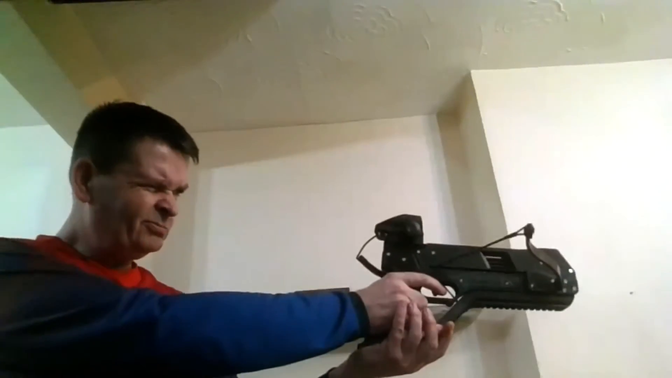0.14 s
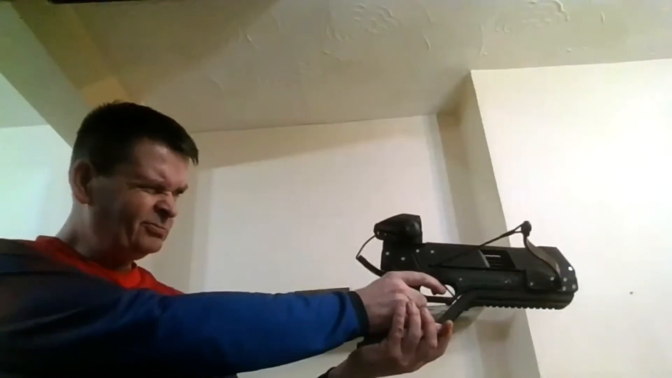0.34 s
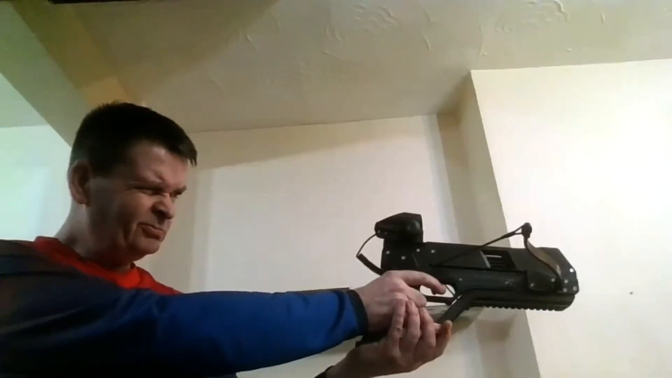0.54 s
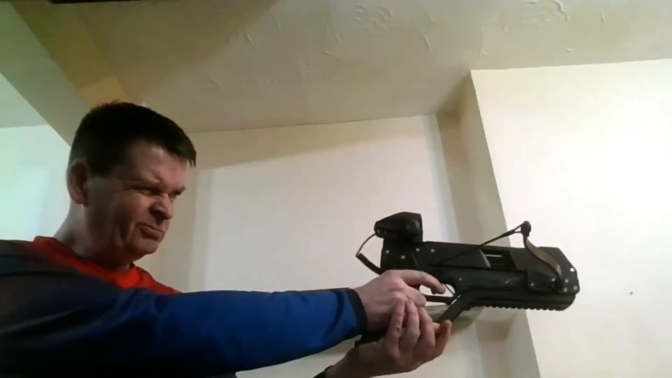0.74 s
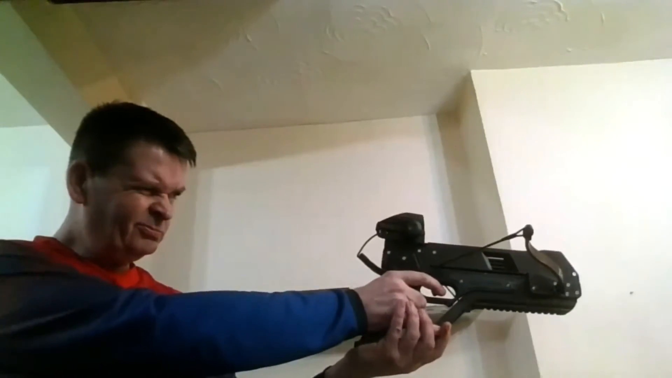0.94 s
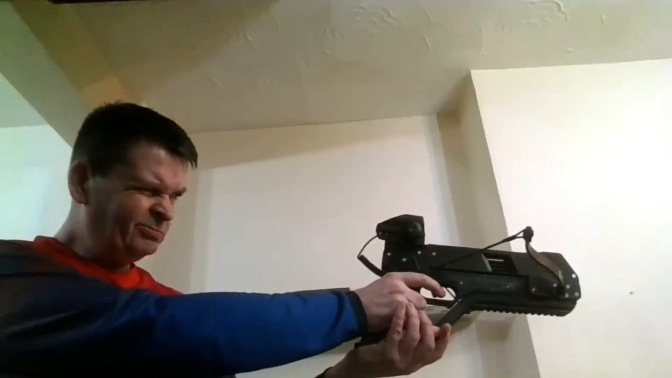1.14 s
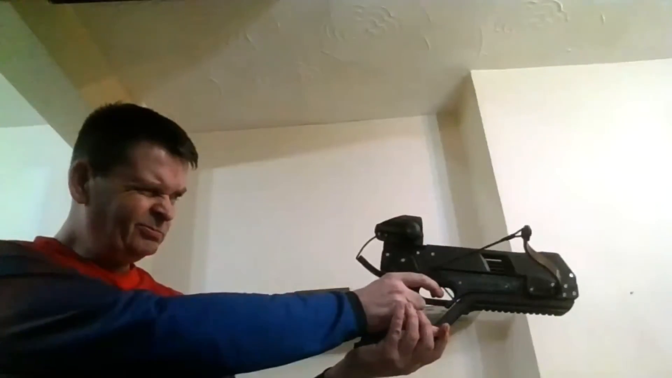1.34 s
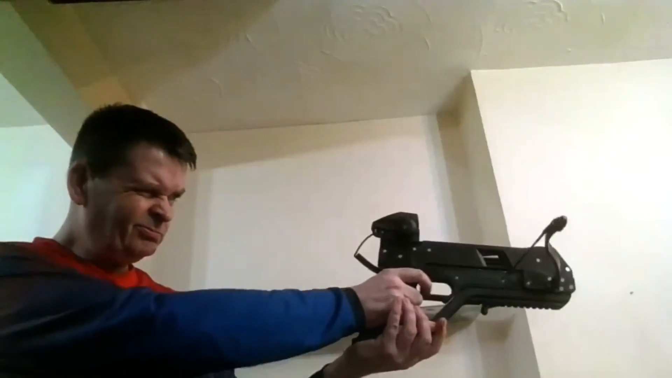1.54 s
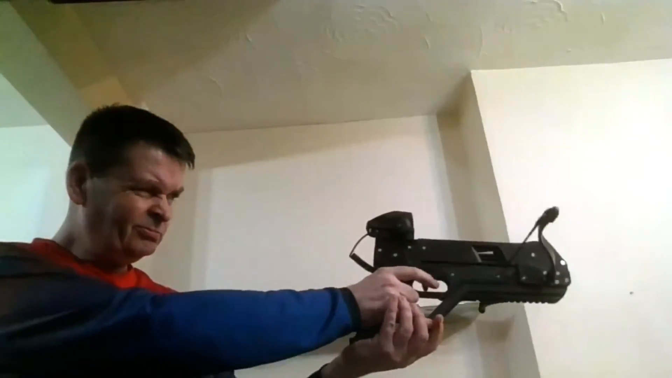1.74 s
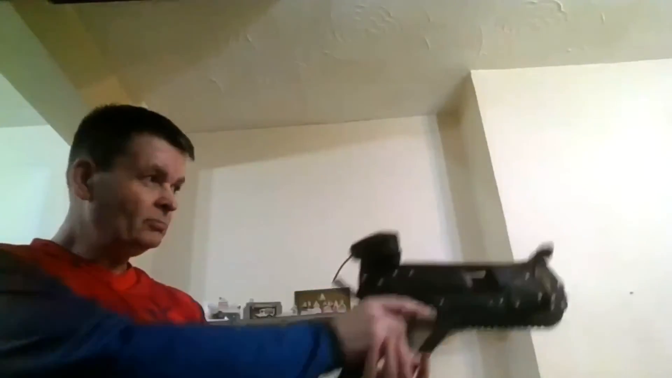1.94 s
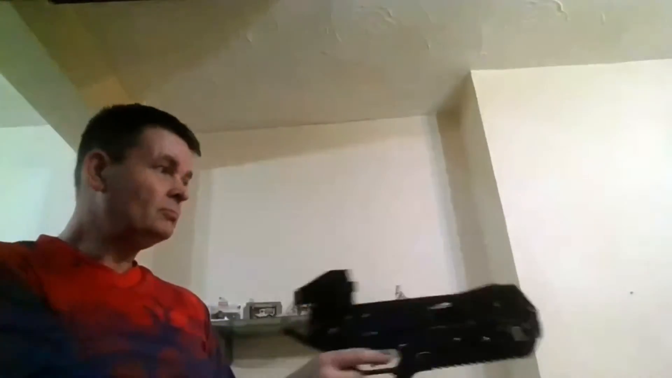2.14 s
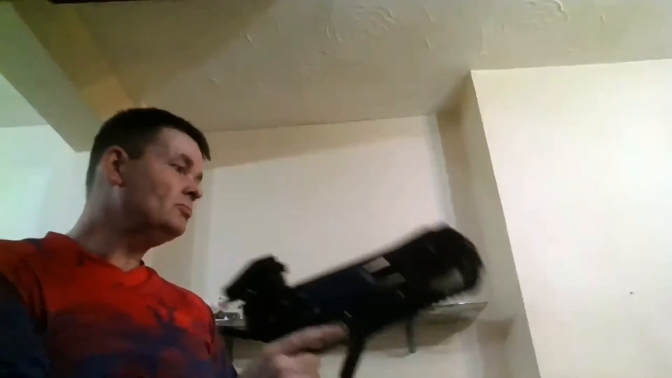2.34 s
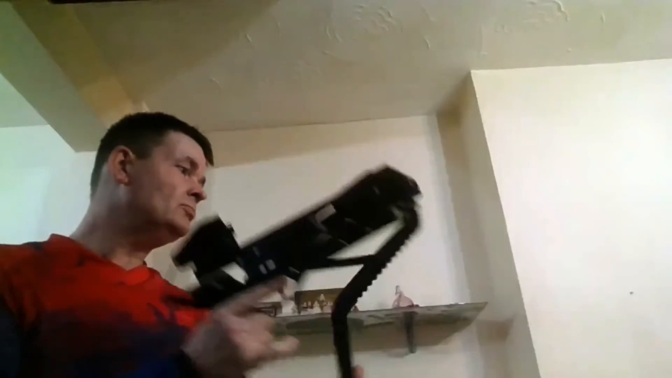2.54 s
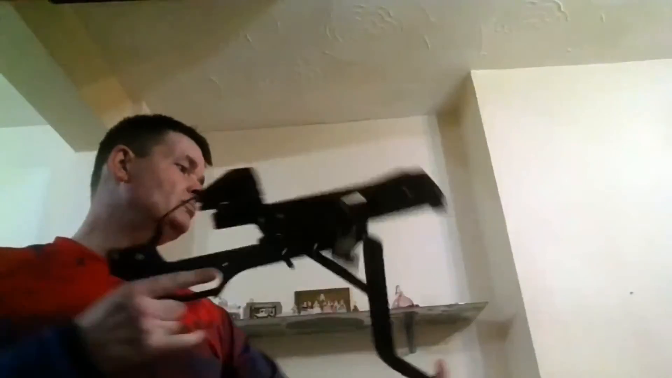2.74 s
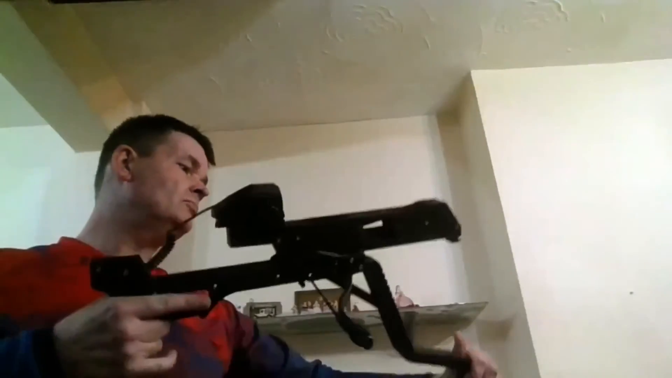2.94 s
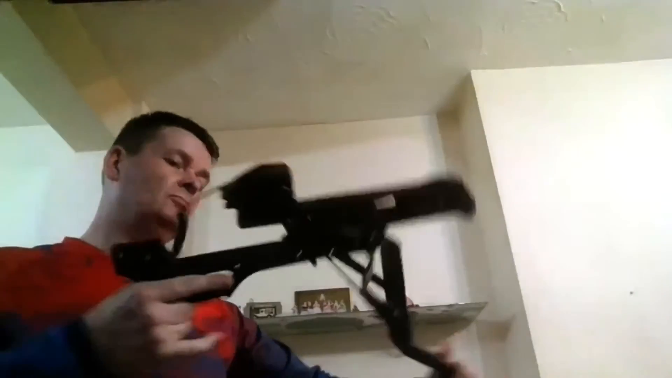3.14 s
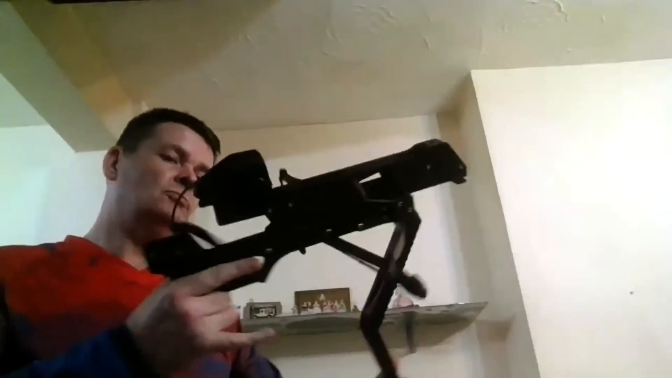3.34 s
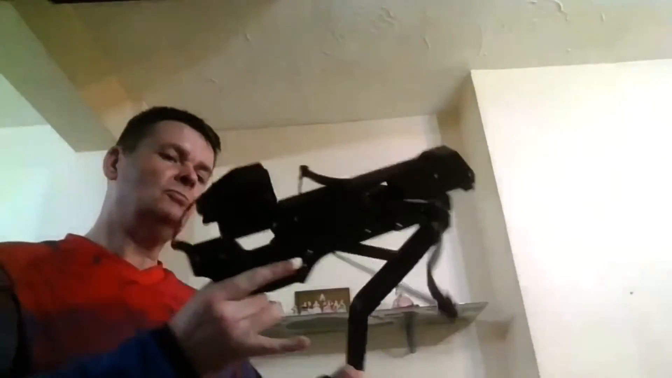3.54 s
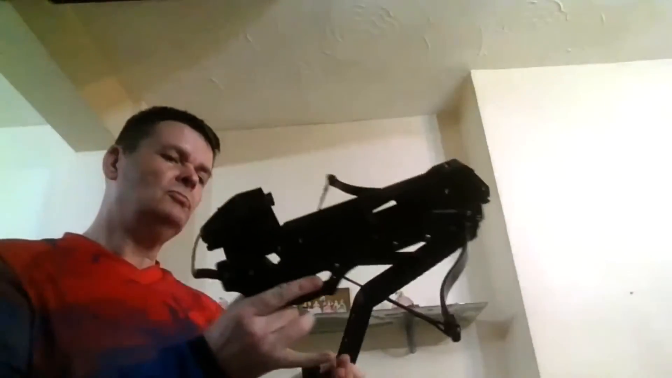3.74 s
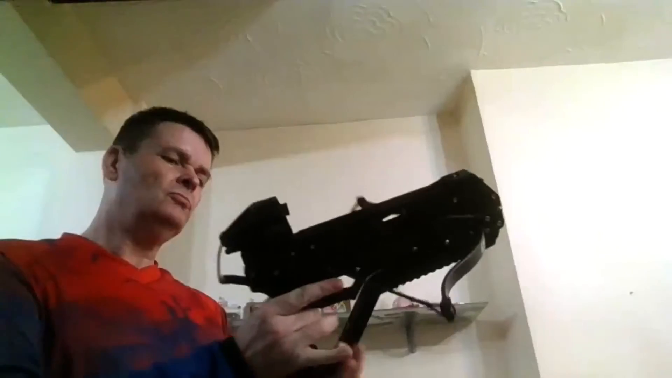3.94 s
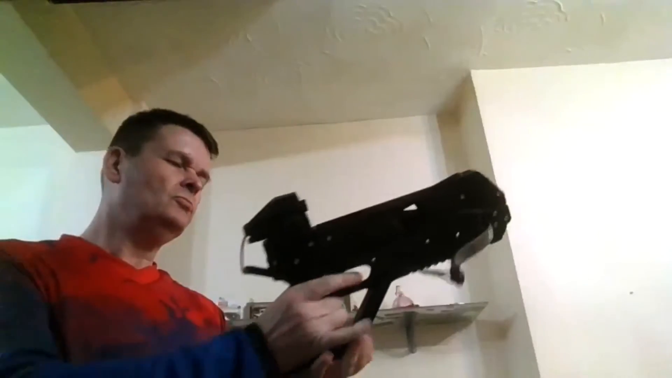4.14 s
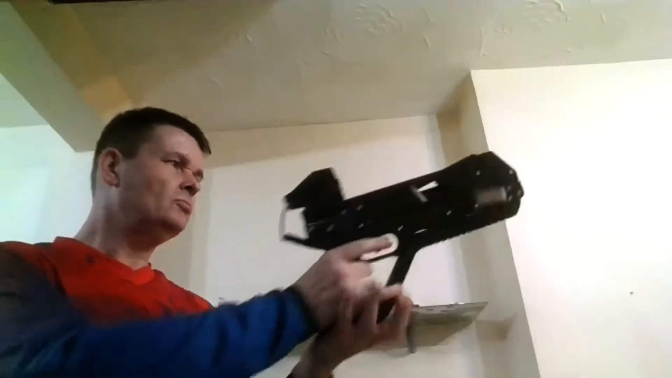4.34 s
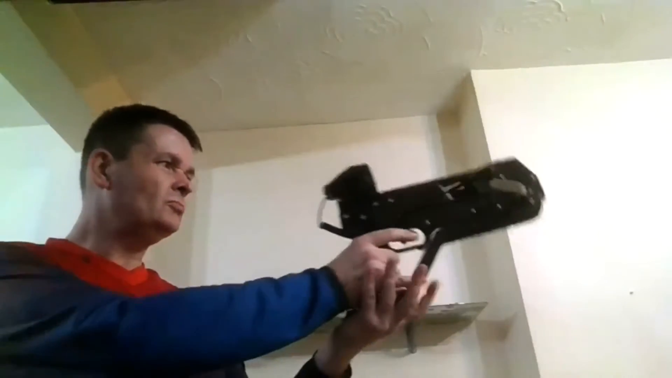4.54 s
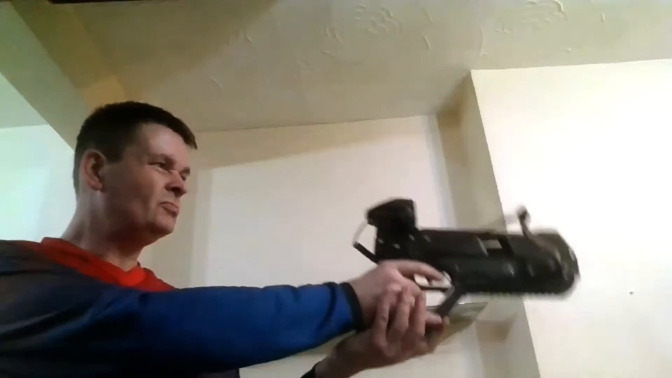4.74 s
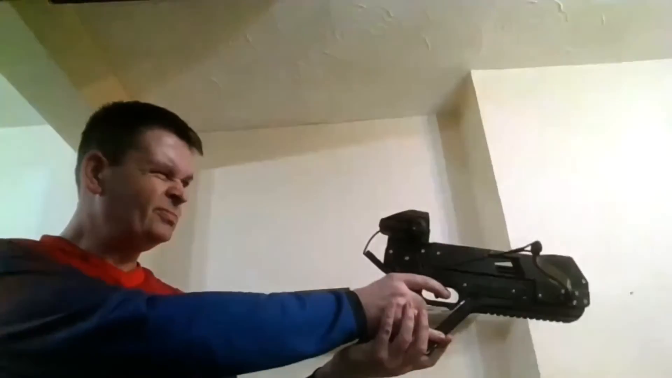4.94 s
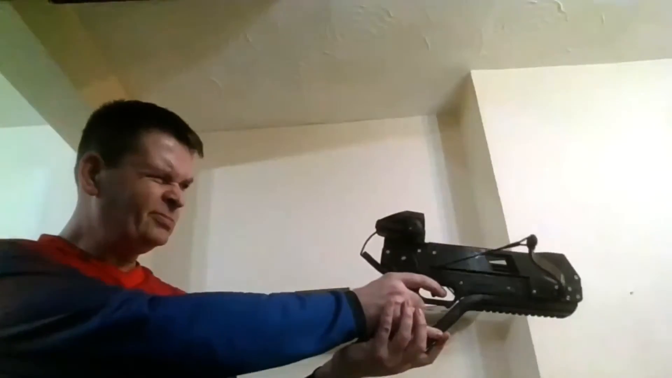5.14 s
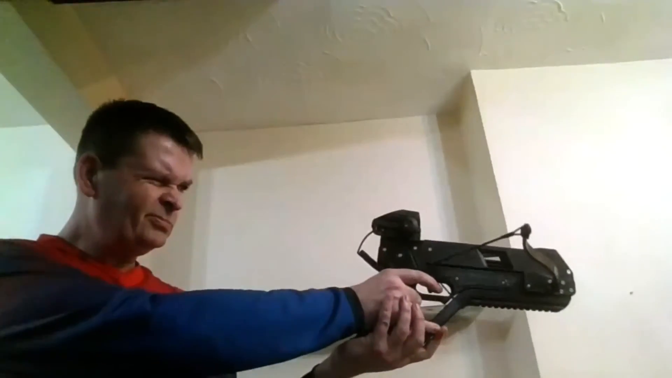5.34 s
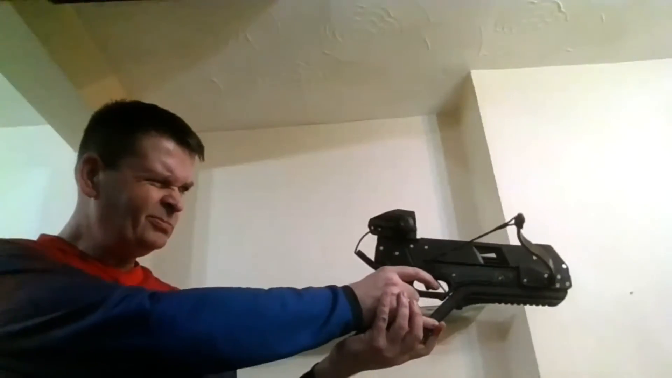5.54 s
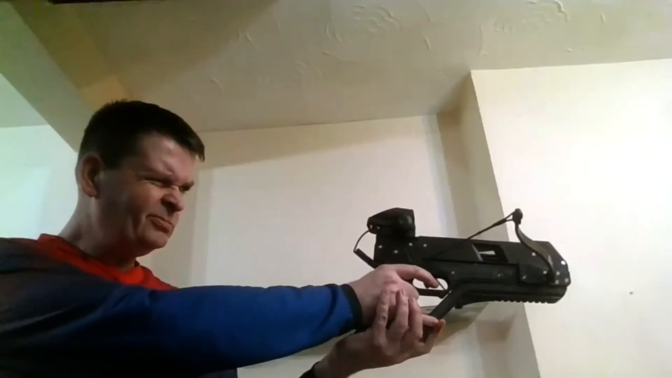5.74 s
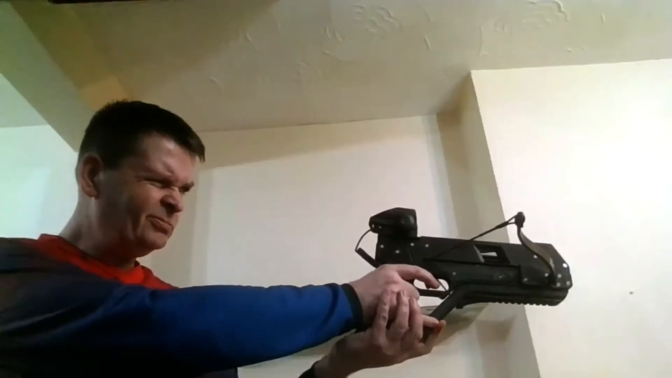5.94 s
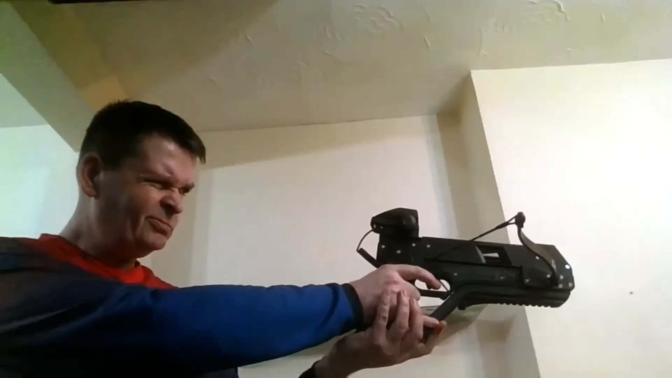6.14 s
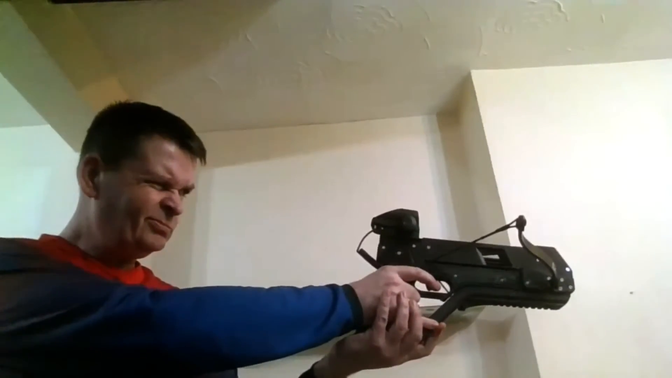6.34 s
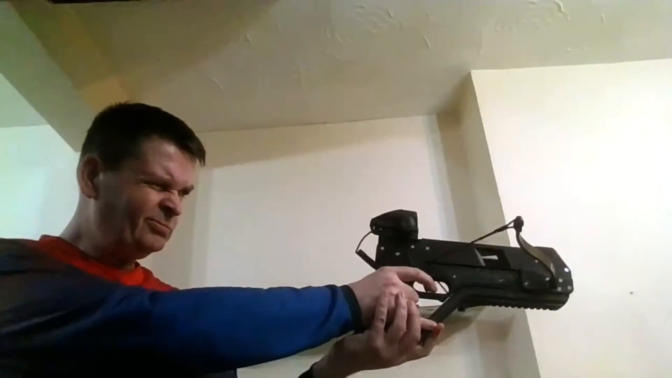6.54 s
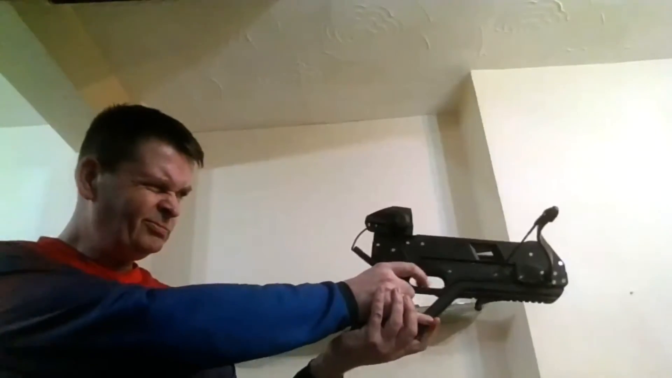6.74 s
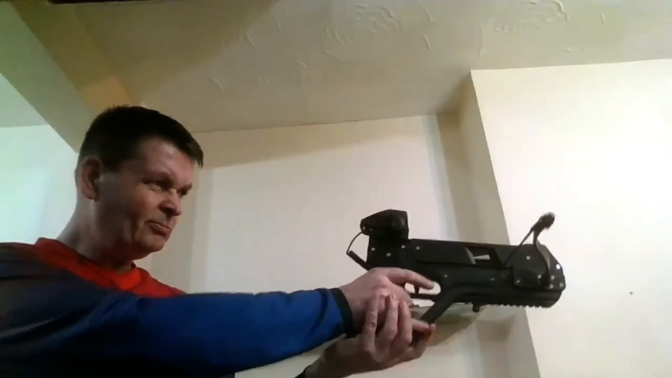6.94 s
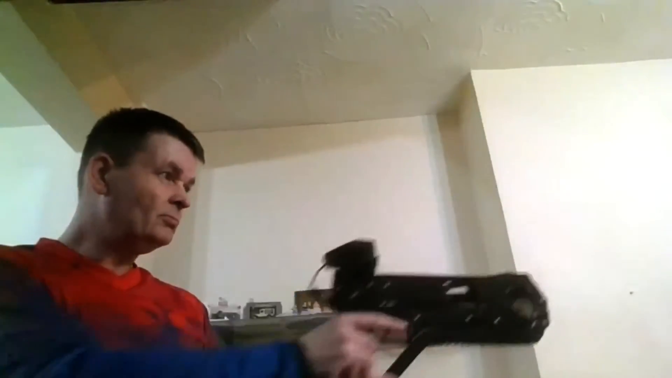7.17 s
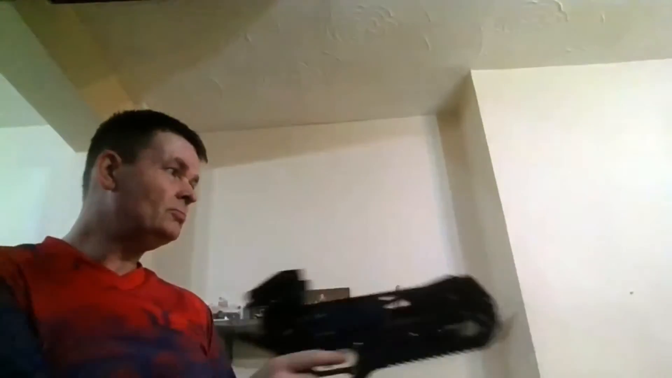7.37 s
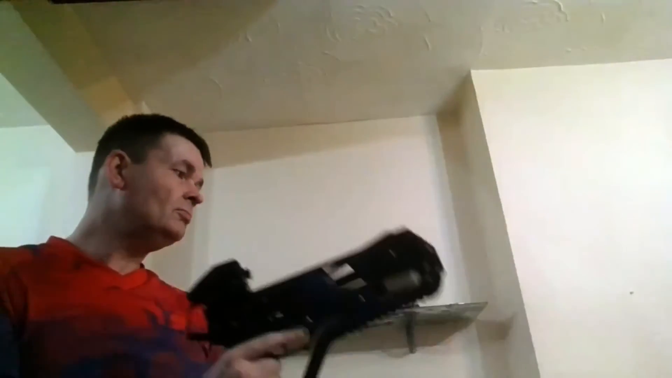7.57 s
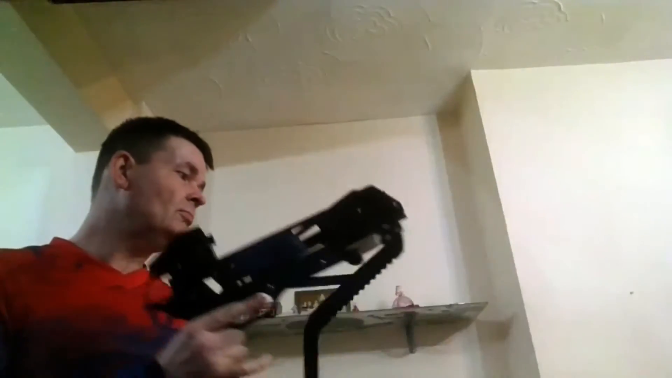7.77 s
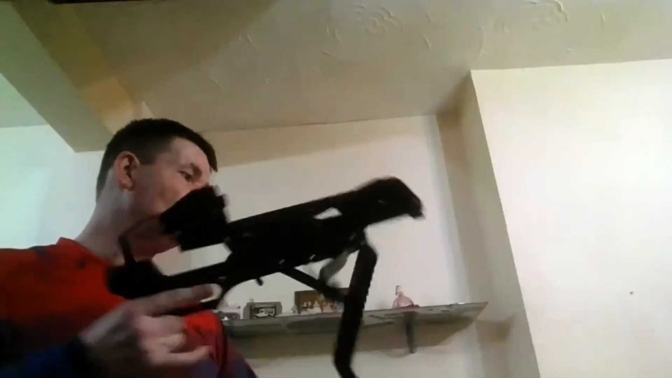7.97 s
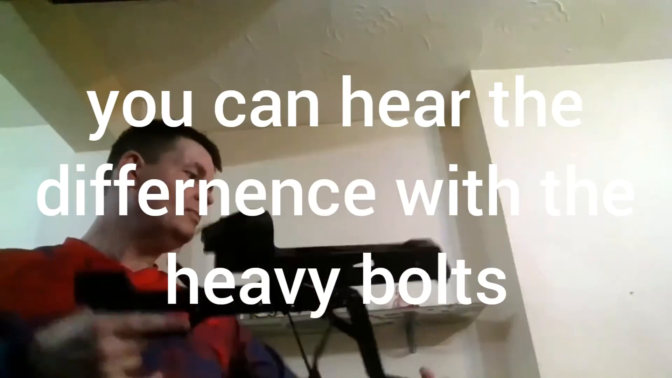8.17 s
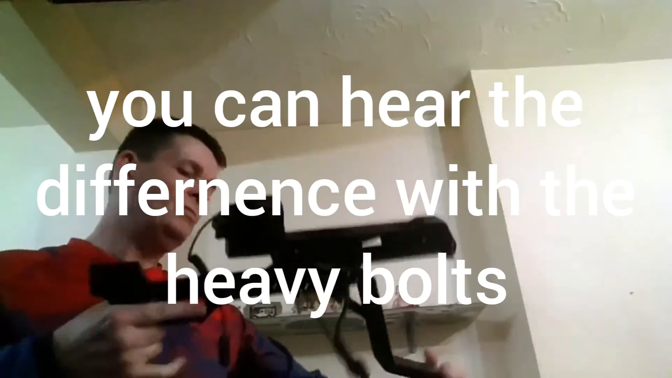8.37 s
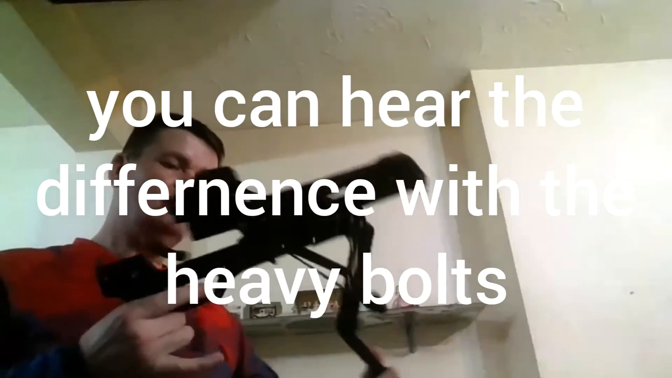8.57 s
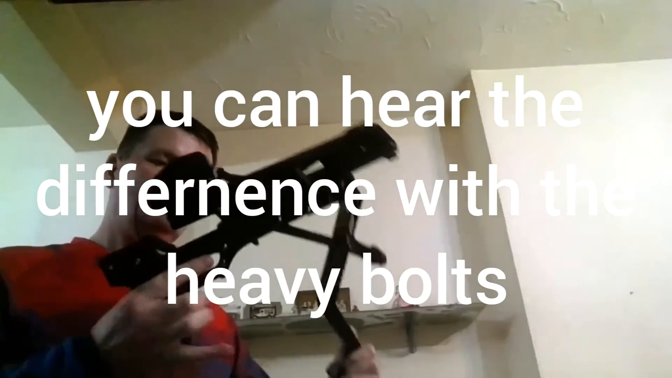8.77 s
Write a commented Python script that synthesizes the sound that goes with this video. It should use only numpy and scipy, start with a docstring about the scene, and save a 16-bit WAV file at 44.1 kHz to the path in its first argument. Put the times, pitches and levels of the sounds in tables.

```python
"""Two sharp cracks ring out in a bare, echoing room, close to a small microphone that overloads: a lever-cocked
pistol crossbow is shot twice. Each bolt slams into a target board a moment later, rebounds and clatters on the floor.
After each shot the cocking lever clicks, slides and knocks over a faint hiss and hum.
Impacts are short noise forces, with room echoes, convolved with resonant bodies; rasps and rustles are shaken,
coloured noise; the board, the bolts' longest modes and the hum are sines."""
import sys
import numpy as np
from scipy import signal
from scipy.fft import rfft, irfft, next_fast_len
from scipy.io import wavfile
from scipy.ndimage import map_coordinates

SR = 44100
rng = np.random.default_rng(int(sys.argv[2]) if len(sys.argv) > 2 else 0)


def wav_record(signal):
    """Record a signal, one row per channel, as 16-bit PCM in the file named by sys.argv[1]."""
    frames = np.transpose(np.atleast_2d(signal))
    bounded = np.clip(frames, -1, 1)
    # unit amplitude maps onto the largest positive 16-bit level
    quanta = np.round(bounded * 32767).astype(np.int16)
    wavfile.write(sys.argv[1], SR, quanta)


N = 388521
LIFE = 2 ** 15  # samples computed for each impact
AGE = np.arange(LIFE) / SR  # seconds since an impact
TIME = np.arange(N) / SR  # seconds since the start

# bolts striking the board: start_s, level_db (of thud and ring alike),
# ring_db (gain of the board's modes, added to level_db)
BOLT_STRIKES = [(1.539, 5, -9.5), (6.7363, 3, -8)]


def amp(db):
    """Decibels to gain: 20 dB is a factor of ten in amplitude."""
    return 10 ** (np.asarray(db) / 20)


def along(points, hz):
    """A spectrum as straight lines between (frequency_hz, value) points on a log-frequency axis."""
    f, v = np.transpose(points)
    return np.interp(np.log(hz + 1), np.log(f + 1), v)


def unit_energy(x):
    """Normalisation: x scaled so that its squares sum to one."""
    return x / np.linalg.norm(x)


def add(track, s, sound):
    """Superposition: mix a sound into the track at s seconds."""
    part = track[round(s * SR):][:len(sound)]
    part += sound[:len(part)]


def filtered(x, gain):
    """Linear filtering: multiply the spectrum of x by a gain that depends on frequency."""
    m = next_fast_len(N + SR // 4)
    hz = np.fft.rfftfreq(m, 1 / SR)
    return irfft(rfft(x, m) * gain(hz), m)[..., :N]


def noise(spectrum):
    """Coloured noise: white noise shaped by a spectrum in dB, then scaled to an rms of one."""
    x = filtered(rng.standard_normal(N), lambda hz: amp(along(spectrum, hz)))
    return x / x.std()


def wobble(rate):
    """Slow random modulation: a smooth curve through `rate` random knots a second."""
    knots = rng.standard_normal(int(N * rate / SR) + 4)
    return map_coordinates(knots, [TIME * rate])


def fade(t60, t=AGE):
    """Exponential decay: the amplitude falls to a thousandth after t60 seconds."""
    return np.exp(-np.log(1000) * t / np.maximum(t60, 1e-3))


def body(spectrum, peaks, shelves=((1000, 0),)):
    """Modal response: the causal impulse response of a broad colour, main resonances and many small modes."""
    hz = np.fft.rfftfreq(LIFE, 1 / SR)
    db = along(spectrum, hz) + along(shelves, hz)
    for centre, width, height in peaks:
        db = db + height / (1 + (2 * (hz - centre) / width) ** 2)
    # the small modes differ from one struck spot to the next
    db = db + 2.2 * map_coordinates(rng.standard_normal(200), [np.sqrt(hz) * 1.2])
    # minimum phase, by folding the cepstrum: the body rings only after it is struck
    cepstrum = irfft(np.log(amp(db)))
    cepstrum[1:LIFE // 2] *= 2
    cepstrum[LIFE // 2:] = 0
    return irfft(np.exp(rfft(cepstrum)))


def spot(spectrum, peaks, low_db, treble_db):
    """Dependence on the point of impact: a body's response with more or less bass and treble."""
    return body(spectrum, peaks, [(1000, low_db), (2200, 0), (6000, 0.0051), (11000, treble_db)])


def blow(response, t60, rise, wet_db, build):
    """Excitation and reverberation: a brief rattling force and its echoes drive a body; energy one."""
    # reverberation time of the room: frequency_hz, t60_s
    room_t60 = [(60, 0.66), (150, 0.66), (400, 0.33), (1000, 0.42), (2500, 0.48), (5000, 0.43), (9000, .38),
                (15000, 0.3)]
    force = fade(t60) * (1 - np.exp(-AGE / rise))
    hz, t, z = signal.stft(rng.standard_normal(LIFE), SR, nperseg=128)
    # the room gathers the power of the contact, summed in frames of 64 samples
    padded_power = np.pad(force ** 2, (0, 64 * len(t) - LIFE))
    fed = padded_power.reshape(len(t), -1).sum(axis=1)
    # each band's echoes build up, then die at its own rate
    held = (fade(along(room_t60, hz)[:, None], t) * (1 - np.exp(-t / build))) ** 2
    power = np.abs(signal.fftconvolve(held, fed[None], axes=1))[:, :len(t)]
    echoes = signal.istft(z * np.sqrt(power), SR, nperseg=128)[1][:LIFE]
    direct = unit_energy(force * rng.standard_normal(LIFE))
    heard = direct + amp(wet_db) * unit_energy(echoes)
    return unit_energy(signal.fftconvolve(heard, response)[:LIFE])


def string_snaps(crack_db, rattle_db):
    """Impulsive excitation: the string cracks against its stop, and the limbs and frame rattle on."""
    # string releases: start_s, level_db (of crack and rattle alike), rattle_t60_s
    shots = [(1.4206, -0.5, 0.36), (6.6201, 1.5, 0.26)]
    # broad colour of the snap: frequency_hz, level_db
    string_colour = [(15, -35), (40, -18), (130, -7), (350, -10), (850, -7.5), (1150, -7), (1800, -1.5),
                     (3500, -2), (7500, -1), (12000, -2), (16000, -9.5)]
    # resonances of the limbs: centre_hz, width_hz, height_db
    limb_modes = [(850, 100, 7), (1850, 380, 3.5), (2650, 540, 3.5)]
    out = np.zeros(N)
    limbs = body(string_colour, limb_modes)
    for s, db, t60 in shots:
        crack = blow(limbs, t60=.05, rise=.012, wet_db=0.5, build=0.006)
        rattle = blow(limbs, t60, rise=.005, wet_db=3.5, build=0.0074)
        add(out, s, amp(db) * (amp(crack_db) * crack + amp(rattle_db) * rattle))
    return out


def bolt_strikes(thud_db):
    """Collision and modal ringing: a heavy thud with the shaft's whang, and the board's decaying sines."""
    # broad colour of the thud: frequency_hz, level_db
    thud_colour = [(15, -28.5), (35, -9), (65, -12.5), (130, -4), (220, -4.5), (400, 3.5), (800, 2.5),
                   (1150, 7), (1900, 0.5), (2700, -2.5), (3900, -8.5), (5500, -8), (7500, -18),
                   (16000, -31.5)]
    # each bolt's shaft as it hits head on, peaks and dead bands: centre_hz, width_hz, height_db
    whangs = [
        [(1920, 230, 3.5), (2980, 350, 9.5), (3900, 500, 2), (5240, 1200, 4.5), (6540, 450, -6.5),
         (7500, 700, 5)],
        [(382, 100, 0.5), (1550, 300, -2), (2390, 400, -14), (3220, 660, 6.5), (3540, 580, 4), (3930, 250, 8),
         (5000, 2600, -4.5)],
    ]
    # modes of the target board: frequency_hz, level_db (added to ring_db), t60_s
    board_modes = [(133.2, -13, 0.59), (360, -3.5, 0.27), (544, -8, 0.61), (548, -9.5, 0.33),
                   (700, -3.5, 0.49), (1064, 4, 0.49), (1120, -3.5, 0.17), (1235, -5, .4),
                   (1405, -3.5, 0.25), (2120, -11.5, .35)]
    out = np.zeros(N)
    for (s, db, ring_db), whang in zip(BOLT_STRIKES, whangs):
        thud = blow(body(thud_colour, whang), t60=0.051, rise=0.00045, wet_db=9, build=0.012)
        ring = np.zeros(LIFE)
        for hz, level, t60 in board_modes:
            ring += amp(level) * fade(t60) * np.sin(2 * np.pi * (hz * AGE + rng.random()))
        ring *= 1 - np.exp(-AGE / .005)  # the board takes a few milliseconds to swing up
        add(out, s, amp(db) * (amp(thud_db) * thud + amp(ring_db) * ring))
    return out


def bolt_bounces():
    """Repeated impact: each bolt rebounds and skitters over the floor, ringing with its own shaft."""
    # contacts of the loose bolt: start_s, energy_db, low_db, treble_db, rattle_t60_s, ring_hz
    bounces = [(1.8197, 19.5, -5.5, -0.5, 0.032, 2720), (1.841, 25, -16, 4.5, 0.15, 12000),
               (1.876, 22.5, -2.5, -4, 0.25, 6700), (2.068, 12.5, -13, 9, 0.053, 6550),
               (2.126, 11, -9, 3.5, 0.018, 6200), (2.2477, 10.5, -11, 1.5, 0.067, 11900),
               (2.331, -1, -5, -12, .035, 1550), (2.382, 0.5, -3.5, -6, 0.065, 13700),
               (7.1263, 19.5, -4.5, 0.5, 0.041, 6970), (7.1409, 14, 7, 3.5, 0.0017, 11700),
               (7.323, 7, -3.5, -15.5, 0.031, 4580), (7.416, 16, -4, -9, 0.02, 6130),
               (7.492, 11, -5.5, -15, 0.055, 1280)]
    # broad colour of the clatter: frequency_hz, level_db
    clatter_colour = [(60, -19), (200, -15), (400, -3), (1000, 0), (1500, 0.5), (2200, -1.5), (3000, 0.5),
                      (7000, 0.5), (12000, -1), (16000, -4.5)]
    # each bolt's shaft ringing freely, peaks and dead bands: centre_hz, width_hz, height_db
    shaft_modes = [
        [(1315, 430, 4), (1810, 150, 5.5), (2300, 330, -3.5), (2800, 290, 3), (4500, 360, 3.5),
         (5400, 350, -1.5), (6350, 580, 1.5), (10550, 850, 6.5)],
        [(895, 260, 5), (1770, 260, 3), (2140, 260, -2), (3700, 130, 0.5), (4680, 110, 5), (5640, 390, -4),
         (6900, 490, 2), (8260, 300, 4), (9300, 520, 2.5), (10600, 490, 7.5), (11600, 330, 6.5)],
    ]
    # each bolt's longest-lived bending mode: frequency_hz, level_db (added to energy_db), t60_s
    bending_modes = [(6380, -55, .8), (4660, -50.5, .8)]
    out = np.zeros(N)
    strike_times = np.array(BOLT_STRIKES)[:, 0]
    for s, db, low_db, treble_db, rattle_s, ring_hz in bounces:
        bolt = np.searchsorted(strike_times, s) - 1  # the bolt that struck last
        ring = (ring_hz, ring_hz / 10, 6.5)  # the resonance this contact brings out: Q 10, 6.5 dB high
        shaft = spot(clatter_colour, [*shaft_modes[bolt], ring], low_db, treble_db)
        add(out, s, amp(db) * blow(shaft, rattle_s, rise=.004, wet_db=4.5, build=0.0025))
        hz, bend_db, t60 = bending_modes[bolt]
        # the shaft tumbles as it rings, so the tone's phase wanders
        tumble = 1.3 * wobble(90)[:LIFE]
        add(out, s, amp(db + bend_db) * fade(t60) * np.sin(2 * np.pi * hz * AGE + tumble))
    return out


def lever_clicks():
    """Contact stiffness: harder-met steel rattles brighter and longer, and one resonance stands out less."""
    # latch and linkage clicks: start_s, energy_db, low_db, ring_hz
    clicks = [(2.7008, -5.5, 1, 1850), (2.7309, 13, -4.5, 9500), (2.743, 7.5, -22, 8200),
              (2.812, 10, -3, 11800), (2.83, 10, -3, 5950), (2.892, -1.5, 6, 1190), (3.259, -9, -14, 3960),
              (3.4243, -10, -6, 4340), (3.457, -15, -1, 1260), (3.557, -18, -16, 2520),
              (3.578, -17, -6.5, 2500), (7.654, -3, 2, 1190), (8.0033, 16.5, -6.5, 2980),
              (8.027, 9, -6, 2650), (8.119, 15.5, -9.5, 5600), (8.136, 7, 1, 1700), (8.186, 1, 8, 2760),
              (8.7445, -12, -5, 1970)]
    # broad colour of the latch: frequency_hz, level_db
    latch_colour = [(60, -9.5), (250, -6.5), (600, -2.5), (950, 1), (1400, -1.5), (2100, 6.5), (3300, 0.5),
                    (6500, 1.5), (12000, 3.5), (16000, 0)]
    # resonances of the steel parts: centre_hz, width_hz, height_db
    steel_modes = [(2730, 160, 7.5), (3830, 130, 7), (5150, 260, 4), (8100, 370, 4), (11500, 400, 2)]
    out = np.zeros(N)
    for s, db, low_db, ring_hz in clicks:
        ring = (ring_hz, ring_hz / 5.3, 8.5 - 0.22 * db)  # Q 5.3; lower for a harder click
        treble_db = -6.5 + 0.42 * db
        steel = spot(latch_colour, [*steel_modes, ring], low_db, treble_db)
        t60 = 0.022 * amp(0.18 * db)  # seconds; a power law of strength
        add(out, s, amp(db) * blow(steel, t60, rise=0.0013, wet_db=-4.5, build=0.00057))
    return out


def stock_knocks(tick_low_db, tick_treble_db, tick_hz):
    """Structure-borne sound: dull knocks and the trigger's thin tick excite the hollow stock."""
    # hands and lever knocking on the stock: start_s, energy_db, low_db, treble_db, ring_hz
    knocks = [(.276, -27, 16, -12, 2010), (.29, -23, 13, -8, 1410), (2.732, -7.5, 8, -12, 500),
              (3.817, -20, 17, 1, 430), (3.831, -16, -24, -14, 2400), (4.0238, 6.5, -0.5, -5.5, 1820),
              (4.2627, -10, 3.5, -11, 900), (4.4465, -11.5, 7, -7, 1150), (4.567, -21, 10, -15, 2300),
              (5.658, -26.5, 12, -12, 600), (7.937, -13, 5, -17, 860)]
    # trigger ticks just before each release: start_s, energy_db
    triggers = [(1.399, -27), (6.557, -27)]
    # broad colour of the stock: frequency_hz, level_db
    stock_colour = [(60, -23.5), (480, -9), (750, -3), (1900, -2), (3500, -6.5), (7000, -13), (13000, -6),
                    (16000, -12)]
    # resonances of the hollow stock: centre_hz, width_hz, height_db
    hollow_modes = [(800, 210, 0), (1120, 66, 5), (1820, 280, 5)]
    out = np.zeros(N)
    ticks = [(s, db, tick_low_db, tick_treble_db, tick_hz) for s, db in triggers]
    for s, db, low_db, treble_db, ring_hz in knocks + ticks:
        ring = (ring_hz, ring_hz / 5, 5.5)  # the resonance this knock brings out: Q 5, 5.5 dB high
        stock = spot(stock_colour, [*hollow_modes, ring], low_db, treble_db)
        # the stock's loose parts rattle for a t60 of 16 ms
        add(out, s, amp(db) * blow(stock, t60=.016, rise=0.00076, wet_db=-5.5, build=.0013))
    return out


def shaken_noise(bursts, texture, judder_db, grain_db):
    """Amplitude modulation: each burst of noise swells, holds and dies away under random fast and slow shaking."""
    attack_s, release_s = 0.025, 0.3  # time to full level; t60 after the burst's length is over
    envelope = np.zeros(N)
    for s, length, db in bursts:
        swell = np.minimum(AGE / attack_s, 1)
        release = fade(release_s, np.maximum(AGE - length, 0))
        add(envelope, s, amp(db) * swell * release)
    shaking = amp(judder_db * wobble(45) + grain_db * wobble(350))
    return envelope * shaking * texture


def rasp(rub_db, slide_db, scrape_db):
    """Superposed noise bands: a low rub, a ringing slide and a high scrape in chosen proportion."""
    # spectra of the three bands: frequency_hz, level_db
    rub_colour = [(100, -19), (400, -6.5), (850, -4.5), (1400, -7), (2200, -11), (5000, -21)]
    slide_colour = [(900, -41), (1700, -7), (2150, -3), (2500, -0.5), (2800, -5.5), (3200, -8),
                    (4400, -7.5), (5500, -11.5), (16000, -40)]
    scrape_colour = [(2500, -33), (6000, 8), (9000, 5), (13000, 6.5), (16000, -5)]
    low = amp(rub_db) * noise(rub_colour)
    ringing = amp(slide_db) * noise(slide_colour)
    high = amp(scrape_db) * noise(scrape_colour)
    return low + ringing + high


def slides_and_rustles():
    """Modulated noise: the lever slides with a metallic rasp, dull rubs rustle, thin high hiss comes and goes."""
    # strokes of the cocking lever in its guides: start_s, length_s, level_db
    strokes = [(2.575, 0.21, -42.5), (3.145, 0.079, -40.5), (3.29, 0.11, -50.5), (3.44, .18, -51.5),
               (3.69, 0.12, -58.5), (7.87, 0.16, -43.5), (8.425, 0.065, -42), (8.55, 0.223, -51.5)]
    # soft dull rubs and faint breath-like rustles: start_s, length_s, level_db
    rustles = [(.01, 0.066, -67), (1.02, 0.055, -65.5), (2.53, 0.24, -49.5), (3.62, 0.26, -60),
               (5.01, .06, -62), (5.63, 0.23, -63), (6.0, 0.053, -62), (7.68, .17, -42.5)]
    # faint bursts of high hiss: start_s, length_s, level_db
    hiss_bursts = [(3.85, 0.18, -63), (4.41, 0.35, -60.5), (7.76, .03, -42.5), (7.805, 0.022, -62),
                   (8.6, 0.081, -54)]
    # colour of the high hiss: frequency_hz, level_db
    high_hiss_colour = [(2000, -30), (6000, -10), (9000, -10), (13500, 3), (16000, -16)]
    lever_rasp = rasp(rub_db=-8, slide_db=-0.5, scrape_db=-6.5)
    lever = shaken_noise(strokes, lever_rasp, judder_db=-0.2, grain_db=1.0)
    dull_rasp = rasp(rub_db=-0.5, slide_db=-3, scrape_db=-16)
    dull = shaken_noise(rustles, dull_rasp, judder_db=0.0, grain_db=2.5)
    high_hiss = shaken_noise(hiss_bursts, noise(high_hiss_colour), judder_db=.8, grain_db=2.0)
    return lever + dull + high_hiss


def background():
    """Stationary noise and tones: steady hiss and the slightly phase-wavering hum of an appliance."""
    # colour of the hiss: frequency_hz, level_db
    hiss_colour = [(12, -28.5), (20, -2.5), (77, -6), (98, -11.5), (150, -9), (193, -17), (262, -13),
                   (293, -23.5), (328, -10.5), (399, -17.5), (607, -19), (802, -24.5), (1570, -26),
                   (2020, -28), (16000, -29)]
    # tones of the hum: frequency_hz, rms_db
    hum_tones = [(323.0, -68), (576.0, -80), (812.9, -78.5)]
    hum = np.zeros(N)
    for hz, db in hum_tones:
        hum += amp(db) * np.sqrt(2) * np.sin(2 * np.pi * hz * TIME + 0.36 * wobble(5.9))
    return amp(-59.5) * noise(hiss_colour) + hum


def scene():
    """Direct-to-reverberant ratio: the far bolt is heard mostly as echo, the near mechanism is dry."""
    shots = string_snaps(crack_db=30, rattle_db=23.5) + bolt_strikes(thud_db=35) + bolt_bounces()
    mechanism = lever_clicks() + stock_knocks(tick_low_db=-8.5, tick_treble_db=6, tick_hz=2700)
    return np.tile(shots + mechanism + slides_and_rustles() + background(), (2, 1))


def overload(x, top, hardness):
    """Saturation: the input stage flattens every peak beyond its range."""
    return x / (1 + np.abs(x / top) ** hardness) ** (1 / hardness)


def record(dry):
    """Mid-side stereo: the overloaded sound is centred, with only the treble spread a little to the sides."""
    # share of the scattered sound sent to the sides: frequency_hz, side_db
    side_width = [(2500, -59.5), (4000, -39.5), (8000, -20.5), (13000, -15.5)]
    top_hz = 16100  # steep upper limit of the band
    mid = overload(dry.mean(axis=0), top=.97, hardness=9)
    scatter = unit_energy(rng.standard_normal(LIFE) * AGE * fade(.012))
    scattered = signal.fftconvolve(mid, scatter)[:N]
    side = filtered(scattered, lambda hz: amp(along(side_width, hz)))
    stereo = np.array([mid + side, mid - side])
    return filtered(stereo, lambda hz: 1 / (1 + (hz / top_hz) ** 120))


dry = scene()
out = record(dry)
wav_record(out)
```